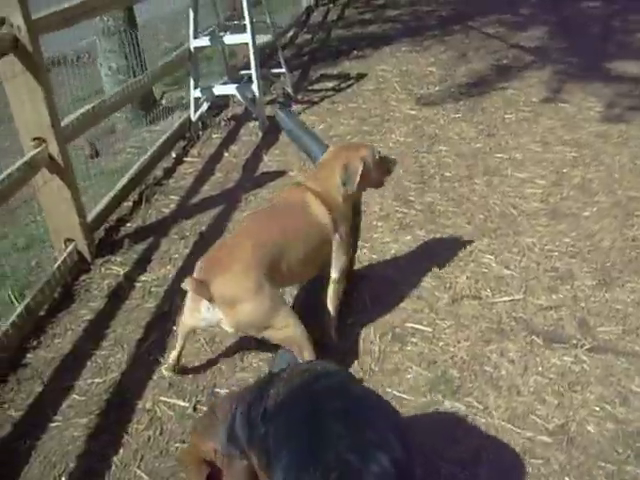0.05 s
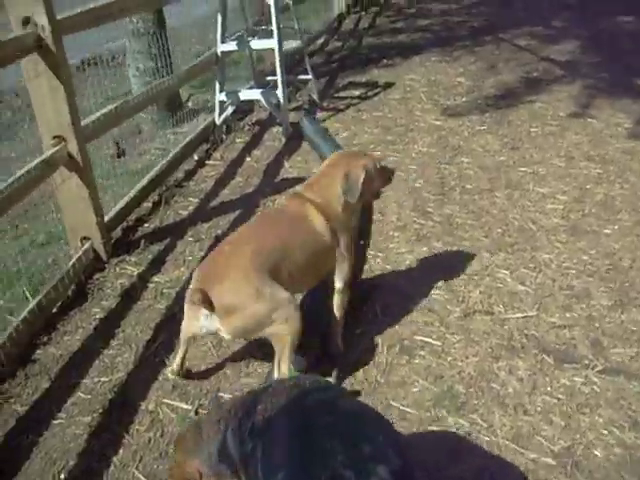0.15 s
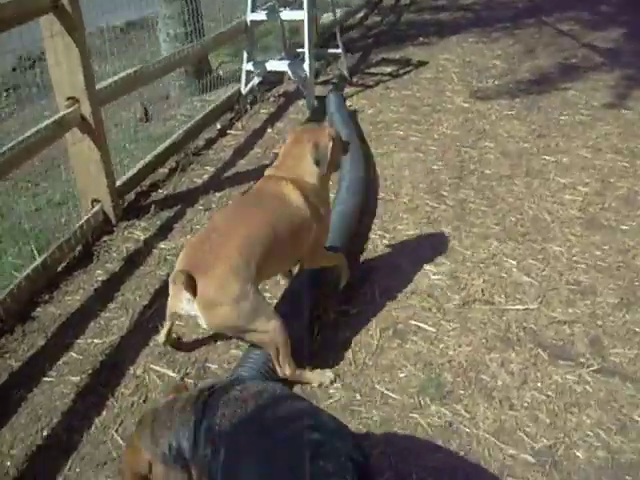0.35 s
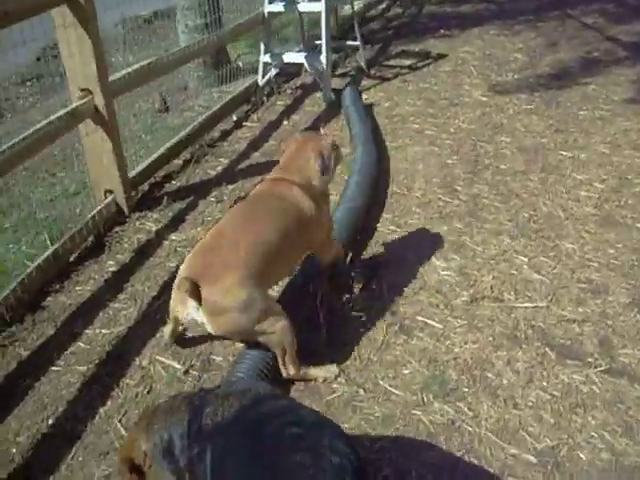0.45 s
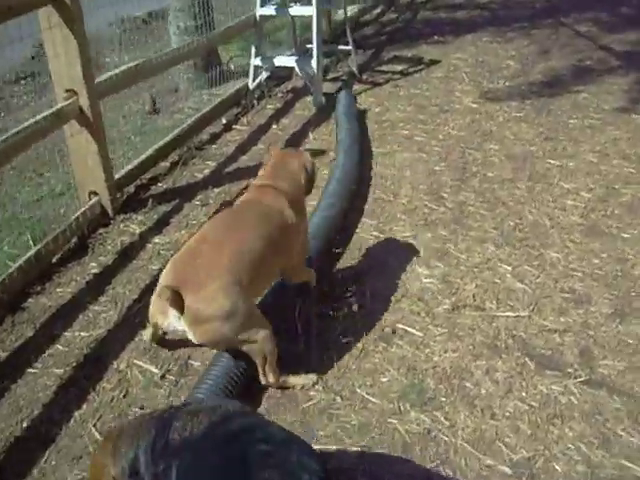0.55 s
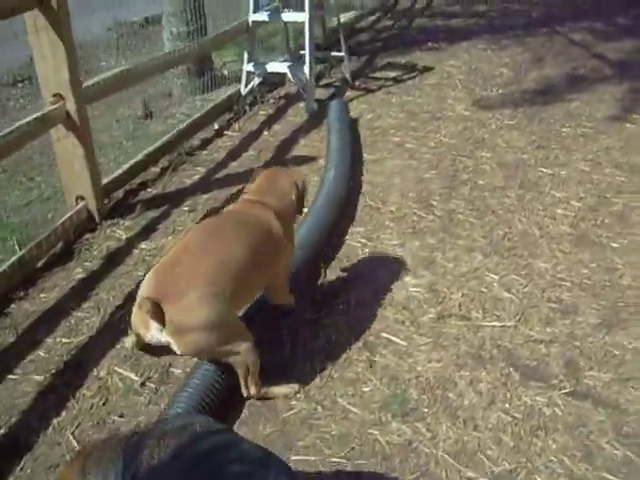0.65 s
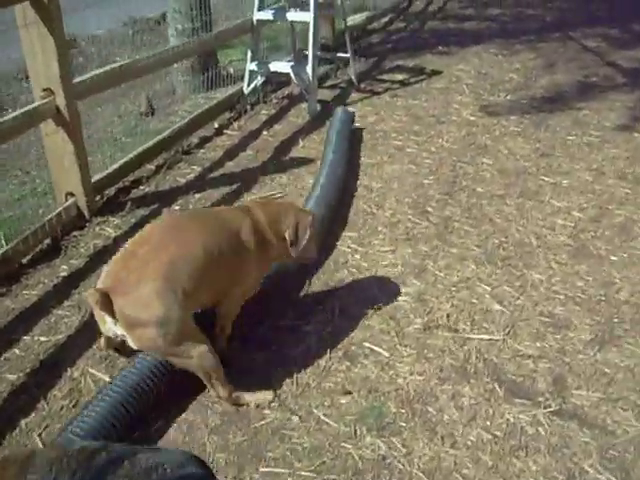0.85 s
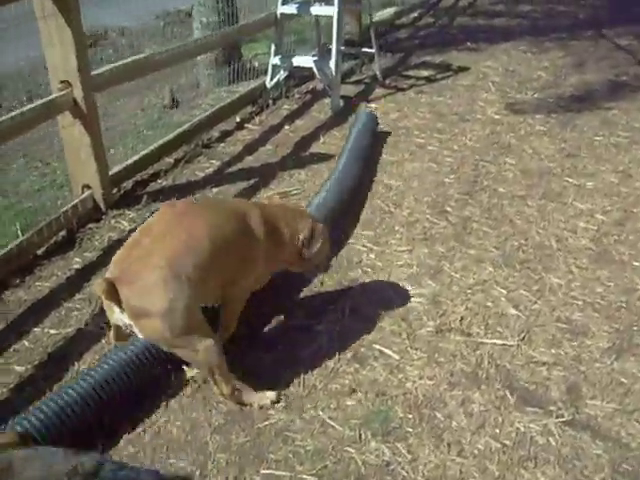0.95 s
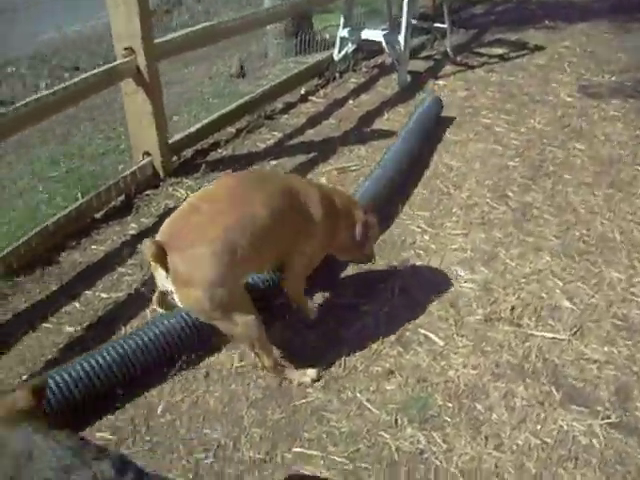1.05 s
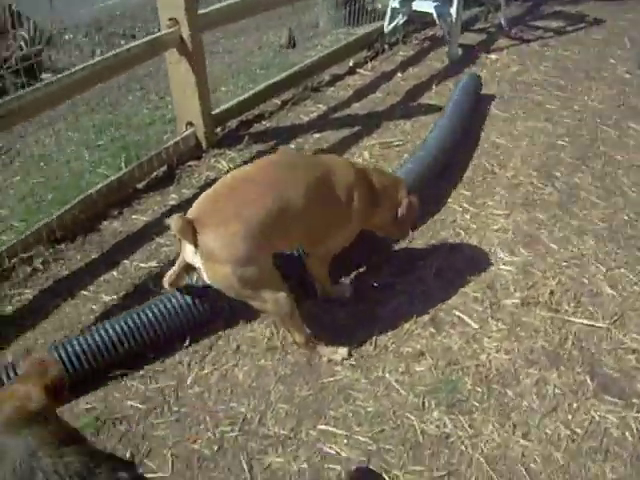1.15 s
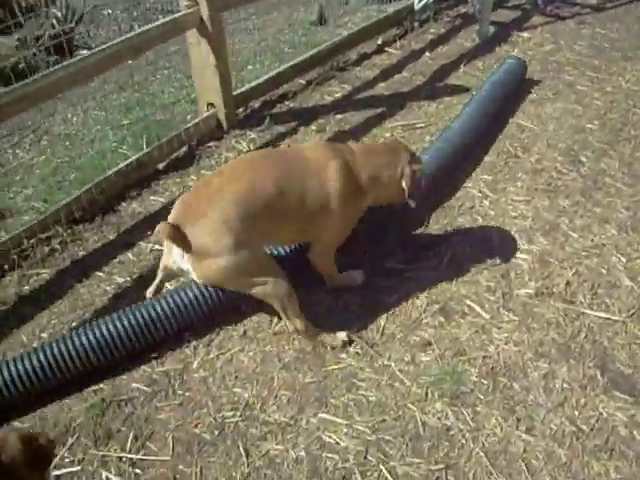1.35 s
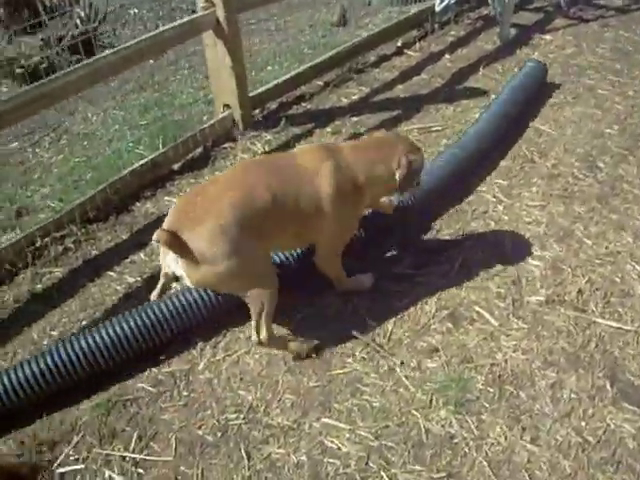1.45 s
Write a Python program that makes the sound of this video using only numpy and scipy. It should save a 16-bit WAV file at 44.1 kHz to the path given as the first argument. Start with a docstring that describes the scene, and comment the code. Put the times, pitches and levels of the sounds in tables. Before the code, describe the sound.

A corrugated plastic pipe is bitten and dragged over straw and dirt. Faint scraping and small crunches lead to a snap at 0.2 s and knocking crunches near 0.38. Two very loud, bright ringing snaps at 0.53 and 0.58 overload the small microphone. Dense crackle and scraping follow, a hollow groan at 0.86, another snap at 1.0, a dull thud at 1.25, then sparse ticks until 1.5 over quiet outdoor air.

```python
"""In an open yard, a dog bites a corrugated plastic drain pipe and drags it over straw and dry dirt.
Runs of filtered clicks make the ribs crunch; bundles of decaying sines make them buckle with a ringing snap.
In between, coloured grains scrape and crackle, slip pulses groan in the hollow pipe and damped notes thud.
Quiet air and a fading hum lie beneath, and the hardest snaps overload the small microphone."""
import sys
import numpy as np
from scipy import signal
from scipy.fft import rfft, irfft
from scipy.io import wavfile

SR = 44100
rng = np.random.default_rng(int(sys.argv[2]) if len(sys.argv) > 2 else 0)


def materialize(psi):
    """Save the field psi as 16-bit PCM at rate SR to the path in sys.argv[1].

    A 1-D psi becomes a single channel; in a 2-D psi each row is a channel.
    """
    bounded = np.clip(np.atleast_2d(psi).T, -1, 1)
    quanta = np.round(bounded * 32767).astype(np.int16)
    wavfile.write(sys.argv[1], SR, quanta)


N = 66150


def undb(db):
    """Decibels to gain."""
    return 10 ** (np.asarray(db) / 20)


def unit(x):
    """Scale to rms 1."""
    return x / np.sqrt(np.mean(x ** 2) + 1e-18)


def decay(t, t60):
    """Exponential decay by 60 dB in t60 seconds."""
    return np.exp(-np.log(1000) * t / t60)


def colour(x, points):
    """Causal minimum-phase filter that follows a response of (Hz, dB) points."""
    size = 2048
    hz, db = np.array(points).T
    f = np.maximum(np.fft.rfftfreq(size, 1 / SR), 1)
    log_gain = np.log(undb(np.interp(np.log(f), np.log(hz), db)))
    # folding the cepstrum onto positive time makes the filter causal
    cepstrum = irfft(log_gain)
    cepstrum[1:size // 2] *= 2
    cepstrum[size // 2 + 1:] = 0
    impulse = irfft(np.exp(rfft(cepstrum)))
    return signal.fftconvolve(x, impulse)[:len(x)]


def resonate(x, hz, width):
    """A resonance applied twice; width is that of one pass, as a share of its centre."""
    b, a = signal.iirpeak(hz, 1 / width, fs=SR)
    once = signal.lfilter(b, a, x)
    return signal.lfilter(b, a, once)


def grains(n, rate, spread_db):
    """Tiny clicks of random timing, sign and size, at an average rate per second."""
    size = undb(spread_db * np.minimum(rng.exponential(size=n), 4))
    hit = rng.random(n) < rate / SR
    return hit * size * rng.choice([-1, 1], n)


def add(out, start, x):
    """Mix a sound in at a time in seconds."""
    i = max(int(start * SR), 0)
    out[i:i + len(x)] += x[:max(N - i, 0)]


SLIPS_PER_S, SLIP_SPREAD_DB, ATTACK_S = 4200, 2.2, 0.00013


def slips(fade_ms):
    """A quickly fading run of tiny slips; the fade is its time constant."""
    t = np.arange(N // 10) / SR
    attack = 1 - np.exp(-t / ATTACK_S)
    return grains(len(t), SLIPS_PER_S, SLIP_SPREAD_DB) * attack * np.exp(-t * 1000 / fade_ms)


def strike(x):
    """Scale to the energy of one short strike: 6 ms at rms 1."""
    return x * np.sqrt(0.006 * SR / (np.sum(x ** 2) + 1e-18))


def burst(fade_ms, points):
    """A run of slips with a colour."""
    return strike(colour(slips(fade_ms), points))


# Colour of the crunching wall. Each row: frequency in Hz, gain in dB.
CRUNCH_COLOUR = [(300, -50.5), (1000, -23.5), (1500, -20), (1950, -2.5), (2700, -3.5), (3150, 0.5),
                 (3900, -2), (4700, -16.5), (7000, -56.5)]
# Colour of the hollow body. Each row: frequency in Hz, gain in dB.
BODY_COLOUR = [(60, -19), (200, -9), (500, -9), (800, -1.5), (1250, 3.5), (1600, 7.5), (2800, -29.5)]
# Colour of crisp rib edges and of straw. Each row: frequency in Hz, gain in dB.
CRISP_COLOUR = [(3000, -51), (5000, 5), (6200, 0.5), (7500, -2.5), (9800, -6.5), (11200, -17), (12500, -56),
                (16000, -78)]
RING_DB, RING_WIDTH = -3, 0.051  # the struck rib's note, relative to the slips; width as a share of its pitch
# Ribs crunching under teeth and paws. Each row: start in seconds, level in dB, fade in ms,
# hollow body in dB and crisp edge in dB (both relative to the level), rib note in Hz.
CRUNCHES = [(0.037, -38, 6.8, -19, -26, 3510), (0.078, -38.5, 15, -11.5, -23, 3200),
            (0.1977, -23.5, 7.8, -24, -19, 4230), (0.289, -27, 11, -17.5, -29, 2976),
            (0.3823, -20, 3.3, -18, -22.5, 3103), (.387, -20, 4.5, -16, -30, 3600),
            (0.4507, -32, 1.5, -18, -25, 3130), (0.4950, -36.5, 1.5, -18, -27, 3170),
            (0.5314, -18.5, 6.2, -14.5, -22.5, 3026), (0.544, -24, 11, -13, -24, 2480),
            (0.5581, -21.5, 7.6, -12.5, -24, 3020), (.573, -27, 24, -9, -41, 2990),
            (0.5833, -15.5, 5.8, -17, -21.5, 2498), (.602, -22.5, 5.4, -13.5, -22, 3220),
            (.626, -30, 23, -7, -18.5, 3400), (.6560, -28.5, 3.3, -22, -20.5, 3260),
            (0.6986, -31.5, 7.1, -37, -17, 3500), (0.733, -24, 8.1, -17, -21, 3180),
            (0.761, -21.5, 4.6, -28, -21.5, 3414), (0.776, -31, 3, -3, -16, 3160),
            (0.7842, -28.5, 3.7, -13, -11, 3240), (0.8108, -23.8, 5, -26, -21, 3420),
            (.836, -33, 10.5, -19, -14, 3600), (0.867, -23.5, 5.8, -42, -17.5, 3165),
            (0.8859, -23, 6.9, -30, -18, 2155), (0.899, -35, 2.5, -27, -17, 3000),
            (0.9615, -25, 5.5, -11.5, -27, 2254), (0.9953, -22, 4.5, -29, -19.5, 2980),
            (1.0109, -30.5, 3.2, -23, -18, 3070), (1.06, -40, 6, -11.5, -34, 3150),
            (1.074, -31.5, 4.2, -18, -28, 3190), (1.085, -32, 4, -27, -20, 3130),
            (1.091, -27.5, 14, -19, -15, 2470), (1.117, -31, 4.7, -12, -26, 2610),
            (1.183, -36, 6, -39, -20, 2610), (1.196, -33, 27, -24, -16.5, 2980),
            (1.2275, -37, 5.3, -29, -32, 3150), (1.3486, -35.5, 2.9, -18.5, -20.5, 2506),
            (1.4714, -31, 5, -12.5, -19, 2980), (1.479, -31.5, 12, -15, -28, 3190)]


def crunches():
    """Slips over the ribs sound the wall, one rib's note, the hollow body and a crisp edge."""
    out = np.zeros(N)
    for start, db, fade, body_db, crisp_db, hz in CRUNCHES:
        note = undb(RING_DB) * strike(resonate(slips(fade / 2), hz, RING_WIDTH))
        wall = strike(burst(fade, CRUNCH_COLOUR) + note)
        body = undb(body_db) * burst(fade, BODY_COLOUR)
        crisp = undb(crisp_db) * burst(fade, CRISP_COLOUR)
        add(out, start, undb(db) * (wall + body + crisp))
    return out


SNAP_BAND_HZ = (1560, 4730)


def thin_wall(x):
    """The thin wall radiates little outside this band."""
    return signal.sosfilt(signal.butter(3, SNAP_BAND_HZ, "band", fs=SR, output="sos"), x)


GROUND_LAG_S, GROUND_DB = 0.0039, -9  # the snap again, off the ground
# Modes of the pipe wall, transposed together for each snap.
# Each row: untransposed pitch in Hz, level in dB, 60 dB decay time in seconds.
WALL = [(2035, -35, 0.17), (2660, -19.5, 0.013), (3077, -3, .018), (3157, -19.5, 0.066),
        (3360, -16, 0.0078), (4360, -34, 0.036)]
# Ribs buckling. Each row: start in seconds, level in dB, pitch of the strongest wall mode in Hz.
SNAPS = [(0.1982, -21, 2260), (0.5331, 0, 3030), (0.5826, 1.5, 3137), (.9960, -6.8, 3240)]


def snaps():
    """A rib buckles at once and rings the wall modes; the ground returns a copy."""
    out, t = np.zeros(N), np.arange(N // 10) / SR
    main_hz = max(WALL, key=lambda mode: mode[1])[0]
    for start, db, hz in SNAPS:
        ring = np.zeros(len(t))
        for mode_hz, mode_db, t60 in WALL:
            pitch = mode_hz * hz / main_hz
            ring += undb(mode_db) * np.sin(2 * np.pi * pitch * t) * decay(t, t60)
        add(out, start, undb(db) * ring)
        add(out, start + GROUND_LAG_S, undb(db + GROUND_DB) * ring)
    return thin_wall(out)


# A single short one-sided pulse as the microphone overloads at the first strong snap.
# The row: start in seconds, peak in dB, length in ms.
OVERLOAD_PULSE = (.5331, -26, 0.98)


def overload_pulse():
    """One short overload pulse of the microphone, a single positive hump."""
    out = np.zeros(N)
    start, db, length_ms = OVERLOAD_PULSE
    add(out, start, undb(db) * signal.windows.hann(int(length_ms * SR / 1000)))
    return out


def bumps(table):
    """Heavily damped notes that swell and die within a few cycles."""
    out, t = np.zeros(N), np.arange(N // 30) / SR
    for start, db, hz, swell_ms in table:
        age = t * 1000 / swell_ms
        swell = age * np.exp((1 - age ** 2) / 2)  # peaks at 1 when age is 1
        add(out, start, undb(db) * swell * np.sin(2 * np.pi * hz * t))
    return out


# Hard bites on the pipe. Each row: start in seconds, peak in dB, pitch in Hz, swell in ms.
KNOCKS = [(0.3812, -36, 934, 2.3), (0.3935, -34, 796, 2.6), (0.5815, -24, 1250, 2.3)]


def knocks():
    """Hard bites knock the hollow of the pipe into short damped notes."""
    return bumps(KNOCKS)


GRAINS_PER_S, GRAIN_SPREAD_DB = 2400, 2.2  # grit under the pipe
STRAWS_PER_S, STRAW_SPREAD_DB = 1700, 1
JERK_HZ, JERK_DB = 109.76, 2.3  # unevenness of the drag: random points per second, typical size
# Colour of the scraping pipe. Each row: frequency in Hz, gain in dB.
SCRAPE_COLOUR = [(150, -43.5), (290, -24), (500, -24.5), (1000, -20.5), (1500, -12.5), (2000, -8.5),
                 (2750, -6), (3150, 1.5), (3550, -9.5), (4100, -9), (4800, -27), (7000, -51.5)]
# Course of the dragging, before its jerks. Each row: time in seconds, level of the pipe's scrape in dB,
# level of the straw's crackle in dB.
DRAG = [(0, -41, -58.5), (.07, -42, -68), (0.137, -53, -76), (0.191, -44, -67), (.225, -42.5, -66),
        (.27, -42.5, -67.5), (.35, -37, -57), (.43, -36.5, -59.5), (0.522, -48.5, -73), (.61, -34.5, -68.5),
        (.68, -38.5, -60.5), (.80, -35, -56), (0.849, -41.5, -61), (.895, -34, -52.5), (.98, -36, -56.5),
        (1.055, -41, -60), (1.105, -32.5, -51), (1.165, -36, -52), (1.213, -37.5, -62), (1.275, -45, -60.5),
        (1.40, -49.5, -64.5), (1.5, -44.5, -61.5)]


def drag():
    """The pipe scrapes jerkily over grit while straw crackles beneath it."""
    t = np.arange(N) / SR
    at, scrape_db, straw_db = np.array(DRAG).T
    jerk = JERK_DB * np.interp(t * JERK_HZ, np.arange(N // 100), rng.standard_normal(N // 100))
    scrape = unit(colour(grains(N, GRAINS_PER_S, GRAIN_SPREAD_DB), SCRAPE_COLOUR))
    straw = unit(colour(grains(N, STRAWS_PER_S, STRAW_SPREAD_DB), CRISP_COLOUR))
    scrape_gain = undb(np.interp(t, at, scrape_db) + jerk)
    straw_gain = undb(np.interp(t, at, straw_db) + jerk)
    return scrape * scrape_gain + straw * straw_gain


TICKS_PER_S, TICK_T60_S = 100, 0.015
TICK_DB = 2.5  # upper limit of a tick, relative to the scrape level
TICK_HZ = (1934, 4010)  # range of their pitches


def rib_ticks():
    """Single ribs flick over grit at random, each with its own short note; levels follow the scrape."""
    out, t = np.zeros(N), np.arange(N // 30) / SR
    at, scrape_db, _ = np.array(DRAG).T
    low_hz, high_hz = TICK_HZ
    for when, pitch, size in rng.random((int(TICKS_PER_S * N / SR), 3)):
        start = when * N / SR
        hz = low_hz + pitch * (high_hz - low_hz)
        ring = np.sin(2 * np.pi * hz * t) * decay(t, TICK_T60_S)
        add(out, start, size * undb(np.interp(start, at, scrape_db) + TICK_DB) * ring)
    return thin_wall(out)


RUB_LOW_HZ, RUB_WIDTH = 323, 0.42  # low resonance; width of both as a share of their pitch
RUB_JITTER, RUB_SPREAD_DB = 0.2, 4.5  # unevenness of slip rate (share) and of slip level
# The hollow pipe groaning as it sticks and slips. Each row: start in seconds, length in seconds,
# level in dB, resonance in Hz, level of the low resonance in dB, slip rate at start, middle and end in Hz.
RUBS = [(0, .1, -53.5, 818, -74, 296, 274.6, 259.8), (0.858, 0.094, -42, 1165, -53, 344.6, 296, 310.1)]


def rubs():
    """Uneven stick-slip pulses glide in rate and excite two hollow resonances of the pipe."""
    out = np.zeros(N)
    for start, length, db, hz, low_db, *rates in RUBS:
        n = int(length * SR)
        i = np.arange(n)
        wobble = np.interp(i, np.linspace(0, n, n // 100), rng.standard_normal(n // 100))
        glide = np.interp(i, np.linspace(0, n, len(rates)), rates)
        rate = glide * (1 + RUB_JITTER * wobble)
        # one pulse per completed cycle
        pulses = np.diff(np.floor(np.cumsum(rate) / SR), prepend=0)
        pulses = pulses * undb(RUB_SPREAD_DB * rng.standard_normal(n))
        groan = undb(db) * unit(resonate(pulses, hz, RUB_WIDTH))
        low = undb(low_db) * unit(resonate(pulses, RUB_LOW_HZ, RUB_WIDTH))
        add(out, start, (groan + low) * signal.windows.tukey(n, .5))
    return out


# Lingering resonances of the whole pipe. Each row: pitch in Hz, width in Hz, gain in dB.
PIPE = [(496, 24, 6.5), (1304, 40, -10.5), (1964, 47, -4), (2060, 13.4, -29), (2634, 88, -6),
        (2930, 19, -16), (4007, 37, -15)]


def pipe(x):
    """The whole pipe rings on after whatever touches it."""
    ringing = np.zeros(N)
    for hz, width, db in PIPE:
        b, a = signal.iirpeak(hz, hz / width, fs=SR)
        ringing += undb(db) * signal.lfilter(b, a, x)
    return x + ringing


SCUFF_DB, SCUFF_MS, SCUFF_HZ, SCUFF_WIDTH = -8.5, 22, 240, 1.2  # dB relative to the landing
# Paws and pipe landing on dirt. Each row: start in seconds, peak of the note in dB, pitch in Hz, swell in ms.
THUDS = [(0.374, -46, 226, 4.4), (0.391, -43, 223, 3.5), (0.629, -47, 200, 4), (0.776, -48, 300, 2),
         (1.057, -47, 215, 4), (1.089, -47.5, 210, 4), (1.2517, -37.5, 241, 5.7), (1.335, -50, 222, 3.2)]


def thuds():
    """Soft landings, each a dull damped note with a scuff of loose dirt."""
    out = bumps(THUDS)
    for start, db, _, _ in THUDS:
        scuff = strike(resonate(slips(SCUFF_MS), SCUFF_HZ, SCUFF_WIDTH))
        add(out, start, undb(db + SCUFF_DB) * scuff)
    return out


YARD_T60_S, YARD_SWELL_S, YARD_DB = 0.16, 0.0093, -15.5


def yard(x):
    """Faint, short scatter from the fence and the ground, as a swelling and decaying noise tail."""
    t = np.arange(N // 4) / SR
    tail = rng.standard_normal(len(t)) * decay(t, YARD_T60_S) * (1 - np.exp(-t / YARD_SWELL_S))
    tail = tail / np.sqrt(np.sum(tail ** 2))
    return x + undb(YARD_DB) * signal.fftconvolve(x, tail)[:N]


AIR_DB, HUM_FADE_DB_PER_S = -63, 5.5  # air level before the wavering
# Colour of the quiet air. Each row: frequency in Hz, gain in dB.
AIR_COLOUR = [(20, -1), (60, -5.5), (130, -6), (220, -4.5), (350, -5.5), (1000, -10), (3000, -18),
              (10000, -27), (12500, -53)]
# Faint distant hum. Each row: pitch in Hz, level in dB before the fade and the wavering.
HUM = [(54, -71.5), (103, -73.5), (156, -75.5), (210, -71)]
# Wavering of air and hum together. Each row: time in seconds, gain in dB.
BACKGROUND = [(0, 3.5), (.28, -4), (.6, 4.5), (1.5, -1)]


def outdoors():
    """Quiet air as coloured noise and a fading distant hum of sines, wavering in level."""
    t = np.arange(N) / SR
    hum = np.zeros(N)
    for hz, db in HUM:
        tone = unit(np.sin(2 * np.pi * (hz * t + rng.random())))
        hum += undb(db - HUM_FADE_DB_PER_S * t) * tone
    air = undb(AIR_DB) * unit(colour(rng.standard_normal(N), AIR_COLOUR))
    at, gain_db = np.array(BACKGROUND).T
    return (hum + air) * undb(np.interp(t, at, gain_db))


def scene():
    """Dog and pipe in the yard, with the microphone's overload pulse."""
    plastic = pipe(crunches() + snaps() + drag() + rubs() + rib_ticks())
    mix = yard(plastic + knocks()) + thuds() + overload_pulse() + outdoors()
    return mix[None]


MIC_TOP_HZ, SOFTEN_HZ, TOP_HZ = 11600, 12200, 16300
CLIP_LEVEL = 0.71  # ceiling of the overload, full scale is 1


def record(dry):
    """The microphone loses the high treble; overload rounds off the hardest snaps; filters cut the top."""
    mic = signal.sosfilt(signal.butter(14, MIC_TOP_HZ, fs=SR, output="sos"), dry)
    # overload at four times the rate, to limit aliasing
    fine = signal.resample_poly(mic, 4, 1, axis=1)
    rounded = fine / (1 + (fine / CLIP_LEVEL) ** 10) ** .1
    clipped = signal.resample_poly(rounded, 1, 4, axis=1)
    soft = signal.sosfilt(signal.butter(3, SOFTEN_HZ, fs=SR, output="sos"), clipped)
    return signal.sosfilt(signal.ellip(8, .2, 70, TOP_HZ, fs=SR, output="sos"), soft)


dry = scene()
out = record(dry)
materialize(out)
```